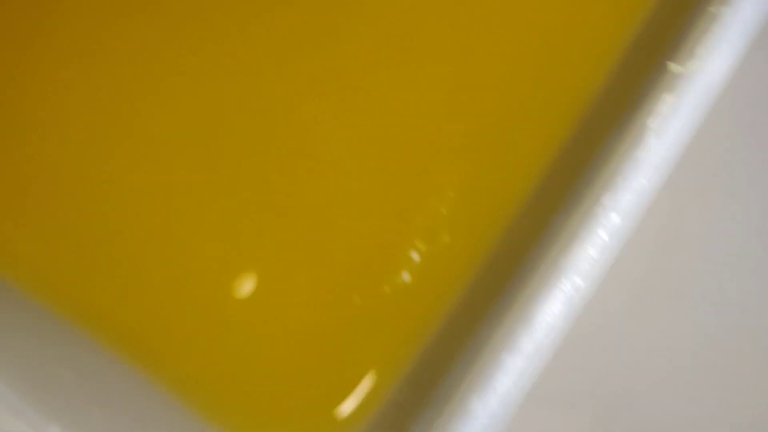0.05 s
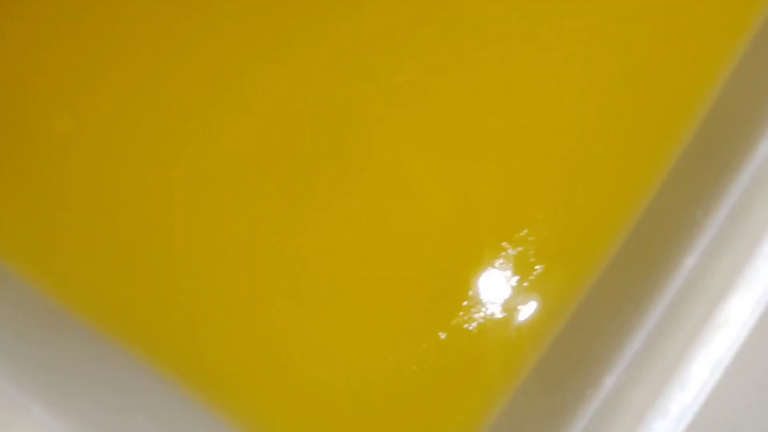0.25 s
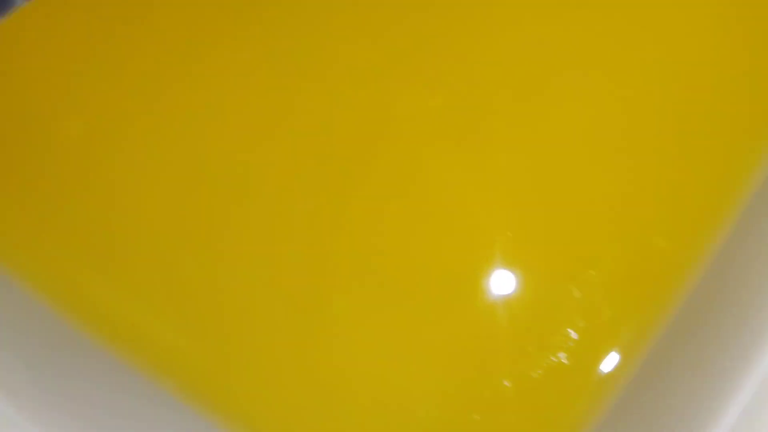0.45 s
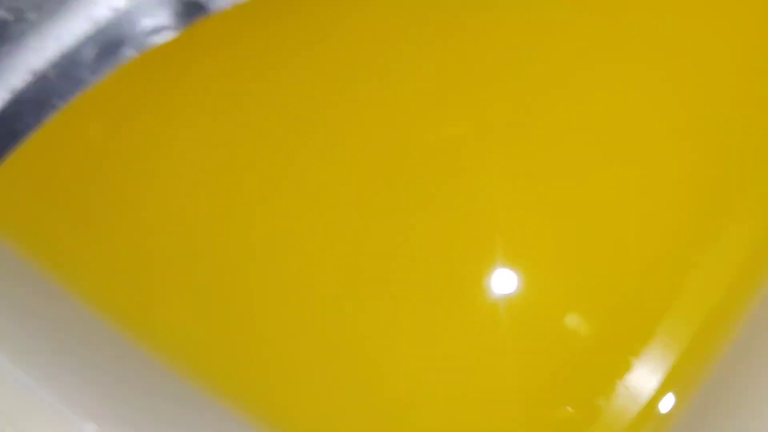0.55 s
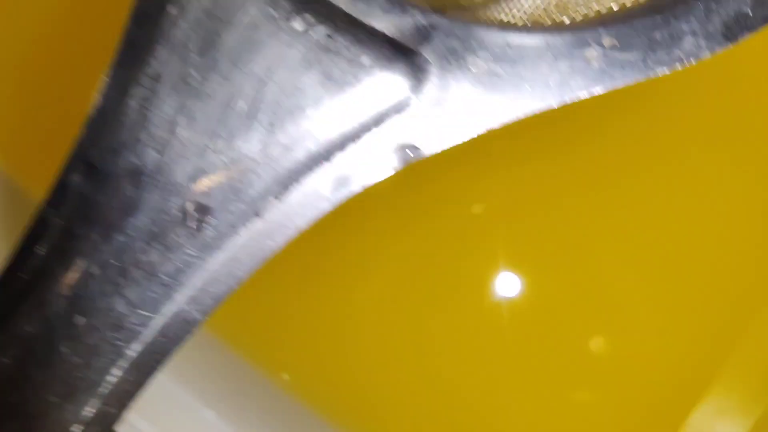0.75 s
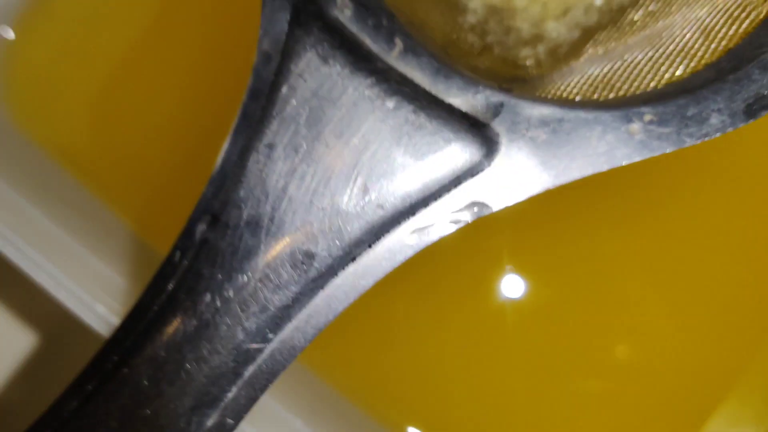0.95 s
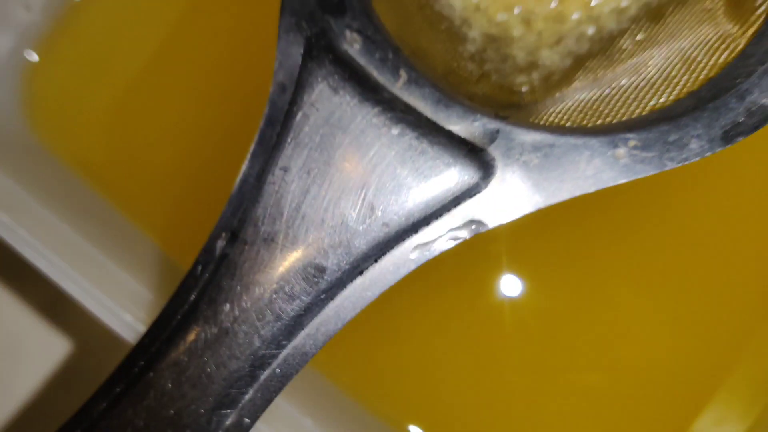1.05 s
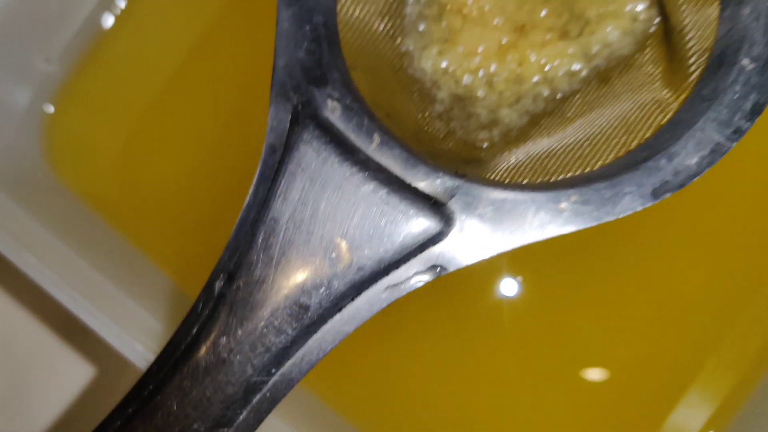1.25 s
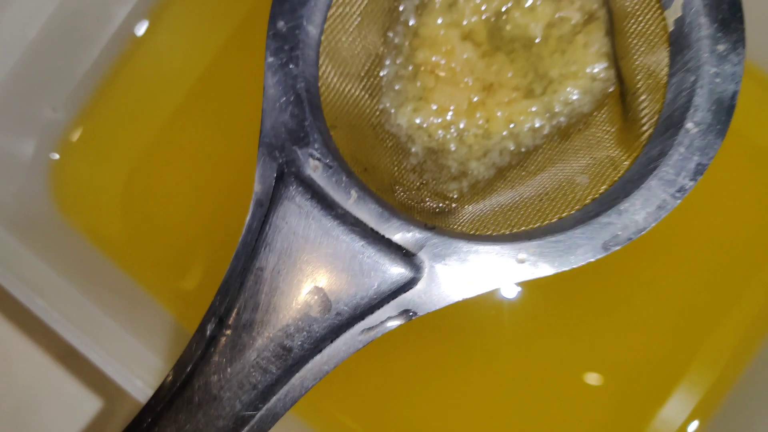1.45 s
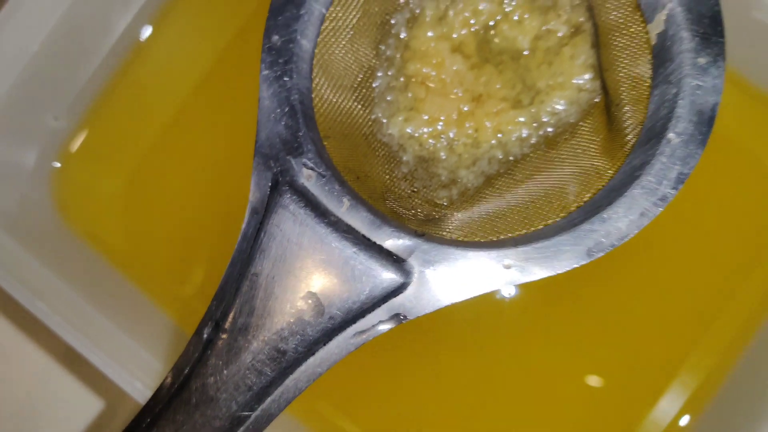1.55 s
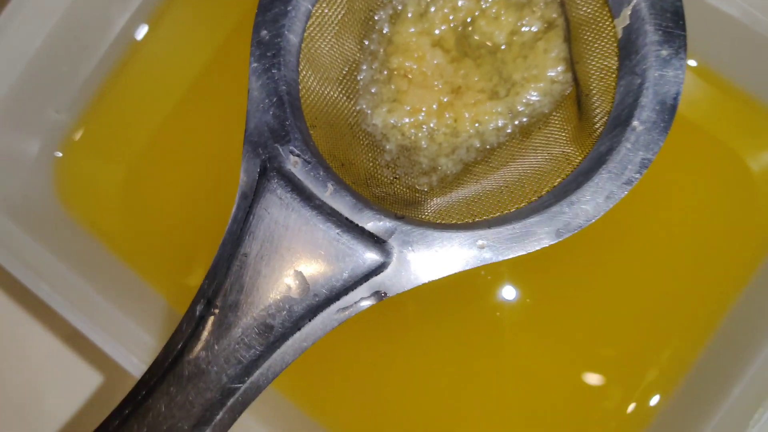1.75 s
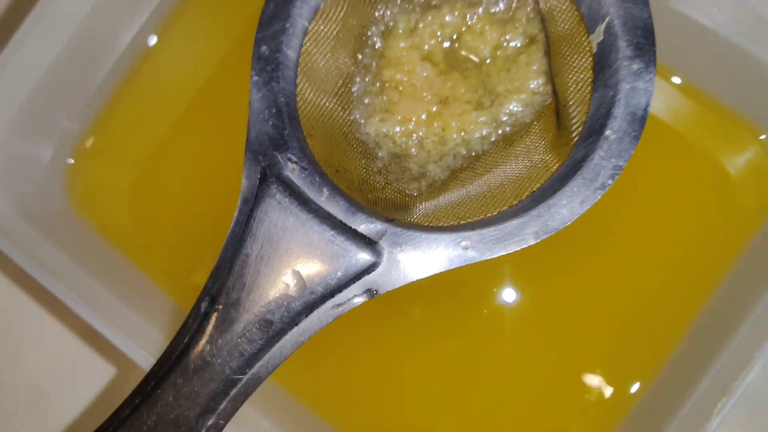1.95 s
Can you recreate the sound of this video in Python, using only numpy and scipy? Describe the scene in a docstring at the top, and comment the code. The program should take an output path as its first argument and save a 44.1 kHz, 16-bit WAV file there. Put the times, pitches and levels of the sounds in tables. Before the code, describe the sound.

A metal strainer knocks twice on the rim of a tub, close by, each hit clattering and ringing briefly over a low boom. Soft handling thumps and a faint rustle follow in the quiet kitchen.

```python
"""Low room noise and a soft bump of a hand on a camera are heard first, in a quiet kitchen.
Close by, a metal strainer knocks twice on the rim of a tub. Each impact clatters, excites the
strainer's modes and sets the tub and counter booming; the room reverberates.
Soft handling thumps follow, then a faint, thinly ringing rustle."""
import sys
import numpy as np
from scipy import signal
from scipy.fft import rfft, irfft, next_fast_len
from scipy.io import wavfile

SR = 44100
rng = np.random.default_rng(int(sys.argv[2]) if len(sys.argv) > 2 else 0)


def inscribe(sig):
    """Save sig as 16-bit PCM at rate SR to the path in sys.argv[1].

    A 1-D sig is mono; a 2-D sig holds one channel per row.
    Samples are clipped to [-1, 1] before scaling.
    """
    pcm = np.round(np.clip(np.atleast_2d(sig).T, -1, 1) * 32767)
    wavfile.write(sys.argv[1], SR, pcm.astype(np.int16))


N = 88200
TIME_S = np.arange(N) / SR

# Room noise spectrum: frequency_hz, density_db
AIR_SPECTRUM = [(12, -33), (20, 0.5), (54, 2), (103, -5.5), (129, -14.5), (157, -3), (238, -24.5),
                (416, -18.5), (565, -28), (767, -28), (932, -30), (3640, -35), (5380, -34), (8880, -45),
                (15500, -42.5)]
# Left-right coherence of the room noise: frequency_hz, coherence
AIR_COHERENCE = [(60, 0.84), (180, 0.9), (550, 0.48), (1650, -0.04), (4970, 0.036), (15000, -0.02)]
# Slow drift of its low and high bands: time_s, gain_db
RUMBLE_DRIFT = [(0, -55.5), (.25, -43.5), (.8, -51), (1.299, -52.5), (1.8, -51), (1.88, -59.5), (2, -59)]
HISS_DRIFT = [(0, -50.5), (.4, -44), (.9, -50), (1.25, -46.5), (1.45, -48.5), (1.6, -52.5), (1.72, -51.5),
              (1.8, -49), (2, -46.5)]
# Dry ticks, handling scuffs and light brushes: centre_s, level_db, half_width_s
DRY_TICKS = [(.049, -61, .002), (1.08, -56.5, .0012)]
SCUFFS = [(.066, -47.5, 0.004), (.098, -37.5, 0.011), (.347, -34, 0.02), (.666, -46.5, .006),
          (.793, -41, 0.0028), (.98, -50, .025), (1.187, -50, 0.013), (1.36, -59.5, 0.15),
          (1.574, -45.5, 0.0061)]
RUSTLE_BRUSHES = [(1.909, -47, .004), (1.932, -51, 0.01705), (1.97, -63, 0.035)]
# Their spectra: frequency_hz, density_db
TICK_SPECTRUM = [(1000, -12), (3500, 0), (7000, 3), (9000, -9), (15000, -11.5)]
SCUFF_SPECTRUM = [(20, -9.5), (70, 1.5), (160, 2.5), (330, -8.5), (700, -18), (1300, -36.5), (4000, -45.5),
                  (15000, -66)]
BRUSH_SPECTRUM = [(200, -9.5), (1200, -9.5), (2600, -12), (4100, -11), (5300, -10.5), (6100, 8.5),
                  (6900, -10.5), (7800, -0.5), (9000, -11), (12000, -15), (13500, -8), (15500, -15.5)]
# Pushes of the hand on the camera: centre_s, level_db, half_width_s
HAND_THUMPS = [(0.069, -32.5, 0.003), (0.353, -30.5, 0.0028), (0.458, -25, 0.0054), (0.525, -25.5, 0.0036),
               (0.665, -38.5, 0.0026), (0.791, -33, 0.0021), (1.189, -39, 0.0031), (1.573, -34, 0.0023)]
# Strainer impacts and rebounds: start_s, level_db, spot (0 or 1, the place struck)
CONTACTS = [(.2085, 0.5, 0), (.2455, -12.5, 0), (.2505, -10, 0), (.259, -18.5, 0), (.338, -27, 0),
            (.433, 0.5, 1), (.461, -19.5, 1)]
# Strainer resonances: pitch_hz, t60_s, spot_0_db, spot_1_db, left_over_right_db
STRAINER_MODES = [(288, 0.21, -30, -40, 6), (314.4, 0.29, -30, -32, 0), (508.5, 0.081, -21.5, -21.5, 6.5),
                  (563.6, .14, -22.5, -18, 3), (609, 0.32, -17, -21.5, 5.5), (628, .13, -22, -19, 2.5),
                  (751, .2, -32, -40.5, -3.5), (1104, 0.061, -31, -19, 1), (1133, .09, -24, -21, -14),
                  (1235.5, 0.059, -22, -20, -16.5), (1485, 0.12, -36.5, -28, 6.5),
                  (1605, 0.064, -36.5, -30.5, -7.5), (1896, .13, -22, -33.5, -10.5),
                  (2240, 0.069, -24.5, -27, 1.5), (2806, 0.2, -37.5, -29, -0.5),
                  (2934, .1, -33, -37.5, -2.5), (3207, 0.053, -35, -21.5, -4), (4150, 0.09, -34, -55, -7),
                  (4260, .12, -23, -34, -4), (4350, 0.074, -27.5, -28, 12), (4658, 0.14, -45, -22.5, -4.5),
                  (5450, 0.18, -37, -35.5, 7), (5630, 0.19, -40, -34.5, 1), (6330, 0.15, -36, -35.5, -5),
                  (8060, 0.18, -44, -53.5, -7.5)]
# Clatter of mesh and rim, one spectrum for each spot: frequency_hz, density_db
CLATTER_SPECTRA = [
    [(60, -15), (200, -3), (400, -13.5), (600, -3.5), (1000, 4), (1500, -3.5), (2200, -6.5), (3400, -17),
     (4200, -2.5), (5000, -16.5), (6400, -8.5), (7200, -28), (8200, -23.5), (8900, -48), (15000, -68)],
    [(60, -14), (200, -11), (400, -12), (560, -1), (850, -1), (1150, 0.5), (2000, -9), (2550, -5.5),
     (3000, -7.5), (3800, -21.5), (4500, -7.5), (5050, -29.5), (5700, -12.5), (8200, -36.5), (8800, -53),
     (15000, -54)],
]
# Left-right coherence of contact noise: frequency_hz, coherence
CONTACT_COHERENCE = [(100, 0.31), (600, 1), (2000, 0.37), (8000, .3)]
# Stereo balance of the clatter: frequency_hz, left_over_right_db
CLATTER_BALANCE = [(200, -9.5), (700, 0), (1500, 2), (2800, -7.5), (4500, 1.5), (6000, 1), (8000, -21.5),
                   (12000, 9)]
# Bright onset of an impact: frequency_hz, density_db
SNAP_SPECTRUM = [(1500, -27.5), (3000, -8), (6000, 13), (8200, 0), (9000, -11.5), (10500, -5.5),
                 (13000, -7), (15500, -10)]
# Reverberation time of the kitchen: frequency_hz, t60_s
REVERB_DECAY = [(100, 0.97), (500, 0.45), (1200, 0.41), (3000, .36), (6000, 0.47), (8300, 0.43),
                (10000, .15)]
# Colour of the reverberation: frequency_hz, gain_db
REVERB_GAIN = [(100, -27.5), (300, -3.5), (600, -9), (1200, -8), (3000, -9), (4700, -9.5), (6000, -9),
               (8300, -9.5), (10000, -23)]
# Impulses on the tub and counter: start_s, level_db
COUNTER_PUSHES = [(.21, -23), (0.433, -25.5), (0.511, -37)]
# Tub and counter resonances: pitch_hz, t60_s, gain_db
COUNTER_MODES = [(60.15, 0.93, -2), (47, 0.4, -27.5), (96, .25, -0.5), (167.4, .25, -12)]
# Faint rings around the rustle: centre_s, level_db, half_width_s, pitch_hz, half_band_hz
THIN_RINGS = [(1.783, -67, 0.057, 786, 5.7), (1.83, -65.5, 0.035, 6190, 60), (1.928, -53, 0.026, 6380, 68),
              (1.95, -65, 0.029, 4050, 37), (1.921, -62.5, 0.022, 7800, 150),
              (1.938, -65, 0.031, 1090, 120)]
# Opposite halves of a left-right difference, one row a channel: share
SIDES = np.array([[.5], [-.5]])


def amp(db):
    """Amplitude grows tenfold for every 20 dB."""
    return 10 ** (np.asarray(db) / 20)


def unit_rms(x):
    """Normalisation to unit mean power."""
    return x / np.sqrt(np.mean(x ** 2) + 1e-20)


def curve_at(points, hz):
    """Interpolation on a logarithmic frequency axis."""
    frequencies, values = np.transpose(points)
    return np.interp(np.log(hz + 1), np.log(frequencies + 1), values)


def since(start_s):
    """Causal time: seconds since an onset, zero before it."""
    return np.maximum(TIME_S - start_s, 0)


def filtered(x, response):
    """Linear filtering multiplies the spectrum by a frequency response."""
    size = next_fast_len(N + SR // 2)
    return irfft(rfft(x, size) * response(np.fft.rfftfreq(size, 1 / SR)), size)[..., :N]


def noise(spectrum, coherence):
    """Partial coherence: the ratio of mid to side noise sets how alike the channels are."""
    def response(hz):
        angle = np.arccos(np.clip(curve_at(coherence, hz), -1, 1)) / 2
        return amp(curve_at(spectrum, hz)) * [np.cos(angle), np.sin(angle)]
    mid, side = filtered(rng.standard_normal((2, N)), response)
    return unit_rms(np.array([mid + side, mid - side]))


def room_noise(crossover_hz=500):
    """Amplitude modulation: the rumble and hiss bands of one noise drift separately in level."""
    air = noise(AIR_SPECTRUM, AIR_COHERENCE)
    rumble = filtered(air, lambda hz: 1 / (1 + (hz / crossover_hz) ** 4))
    hiss = air - rumble
    gain = lambda drift: amp(np.interp(TIME_S, *np.transpose(drift)))
    return gain(RUMBLE_DRIFT) * rumble + gain(HISS_DRIFT) * hiss


def touches(events, spectrum, coherence):
    """Friction noise swells and fades at each light contact; incoherent sources add in power."""
    power = sum(amp(2 * db) / (1 + ((TIME_S - centre_s) / half_width_s) ** 2) ** 2
                for centre_s, db, half_width_s in events)
    return np.sqrt(power) * noise(spectrum, coherence)


def hand_thumps():
    """Heavy damping: each push of the hand springs back without ringing."""
    out = np.zeros(N)
    for centre_s, db, half_width_s in HAND_THUMPS:
        offset = (TIME_S - centre_s) / half_width_s
        out += amp(db) * (offset ** 2 - 1) * np.exp(-offset ** 2 / 2)
    return out


def clatter(start_s, spot, attack_s=.00088, hold_s=.0068, t60_s=.054, relative_width=.029):
    """Resonant filtering: mesh and rim make a dense noise, part of which passes through the modes."""
    def resonances(hz):
        power = 0
        for pitch_hz, mode_t60_s, *spot_db, _ in STRAINER_MODES:
            detuning = (hz - pitch_hz) / (relative_width * pitch_hz)
            power += amp(2 * spot_db[spot]) * mode_t60_s / pitch_hz / (1 + detuning ** 2) ** 2
        return np.sqrt(power)
    white = noise([(20, 0), (20000, 0)], CONTACT_COHERENCE)
    resonant = amp(-18) * unit_rms(filtered(white, resonances))
    broadband = amp(-15.5) * noise(CLATTER_SPECTRA[spot], CONTACT_COHERENCE)
    attack = 1 - np.exp(-since(start_s) / attack_s)
    decay = amp(-60 * since(start_s + hold_s) / t60_s)
    balance = lambda hz: amp(SIDES * curve_at(CLATTER_BALANCE, hz))
    return attack * decay * filtered(broadband + resonant, balance)


def snap(start_s, attack_s=.0015, t60_s=.016):
    """Impact transient: a brief contact spreads its energy into the treble."""
    age = since(start_s)
    envelope = amp(-33 - 60 * age / t60_s) * (1 - np.exp(-age / attack_s))
    return envelope * noise(SNAP_SPECTRUM, CONTACT_COHERENCE)


def strainer_ring(start_s, spot, attack_s=.0017, phase_blur=.26):
    """Free vibration: each mode decays exponentially, its pitch blurred by a random walk in phase."""
    out = np.zeros((2, N))
    age = np.arange(SR // 2) / SR
    onset = round(start_s * SR)
    for pitch_hz, t60_s, *spot_db, pan_db in STRAINER_MODES:
        drift = phase_blur * np.cumsum(rng.standard_normal(len(age))) * np.sqrt(pitch_hz / SR)
        envelope = amp(spot_db[spot] - 60 * age / t60_s) * (1 - np.exp(-age / attack_s))
        mode = envelope * np.sin(2 * np.pi * pitch_hz * age + drift)
        out[:, onset:onset + len(age)] += amp(SIDES * pan_db) * mode
    return out


def strainer_knocks(left_lag_s=.00038, ring_db_per_db=.2):
    """Impact excitation: the strainer sounds from the right, so its waves reach the left later."""
    out = np.zeros((2, N))
    for start_s, db, spot in CONTACTS:
        contact_noise = clatter(start_s, spot) + snap(start_s)
        ring = amp(ring_db_per_db * db) * strainer_ring(start_s, spot)  # light contacts ring less
        out += amp(db) * with_reverb(contact_noise + ring)
    return filtered(out, lambda hz: np.exp(-2j * np.pi * hz * SIDES * left_lag_s))


def counter_boom():
    """Modal superposition: each push sets the low modes of tub and counter ringing down."""
    return sum(amp(db + mode_db - 60 * since(start_s) / t60_s) * np.sin(2 * np.pi * hz * since(start_s))
               for start_s, db in COUNTER_PUSHES for hz, t60_s, mode_db in COUNTER_MODES)


def with_reverb(direct, delay_s=.0054):
    """Diffuse reverberation follows the direct sound, each frequency dying at its own rate."""
    hz, age, spectra = signal.stft(rng.standard_normal((2, SR * 3 // 4)), SR, nperseg=256)
    decay = amp(-60 * age / curve_at(REVERB_DECAY, hz)[:, None])
    energy = np.sum(decay ** 2, axis=1, keepdims=True) * age[1] * SR
    gain = amp(curve_at(REVERB_GAIN, hz))[:, None] / np.sqrt(energy)
    _, tail = signal.istft(spectra * decay * gain, SR, nperseg=256)
    tail = np.pad(tail, ((0, 0), (int(delay_s * SR), 0)))
    return direct + signal.fftconvolve(direct, tail, axes=1)[:, :N]


def thin_rings():
    """Narrow-band noise is heard as pitch: faint rings swell and fade around the rustle."""
    out = np.zeros((2, N))
    for centre_s, db, half_width_s, pitch_hz, half_band_hz in THIN_RINGS:
        resonance = lambda hz: 1 / (1 + ((hz - pitch_hz) / half_band_hz) ** 2)
        band = unit_rms(filtered(rng.standard_normal((2, N)), resonance))
        swell = np.exp(-((TIME_S - centre_s) / half_width_s) ** 2 / 2)
        out += amp(db) * swell * band
    return out


def scene():
    """Superposition: the pressures of all the sources add."""
    ticks = touches(DRY_TICKS, TICK_SPECTRUM, CONTACT_COHERENCE)
    scuffs = touches(SCUFFS, SCUFF_SPECTRUM, coherence=[(100, 1), (1000, 1)])
    lows = (scuffs + hand_thumps() + counter_boom()) * amp(SIDES * 2)  # 2 dB louder on the left
    rustle = touches(RUSTLE_BRUSHES, BRUSH_SPECTRUM, coherence=[(500, .5), (6000, .2)])
    return room_noise() + ticks + lows + strainer_knocks() + thin_rings() + rustle


def record(dry, ceiling=.99, band_limit_hz=15800):
    """Soft saturation and band limiting: the camera rounds high peaks and cuts the top treble."""
    rounded = dry / (1 + np.abs(dry / ceiling) ** 10) ** (1 / 10)
    return filtered(rounded, lambda hz: hz < band_limit_hz)


dry = scene()
out = record(dry)
inscribe(out)
```